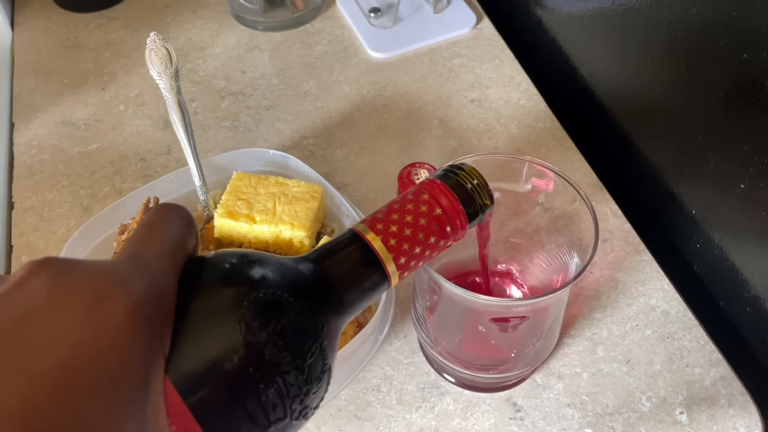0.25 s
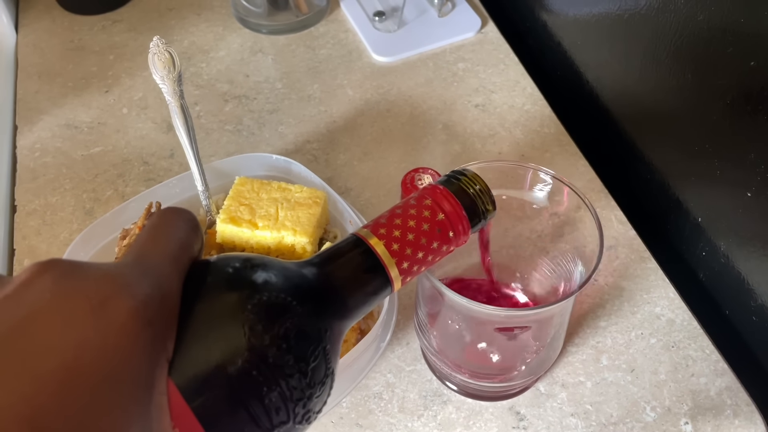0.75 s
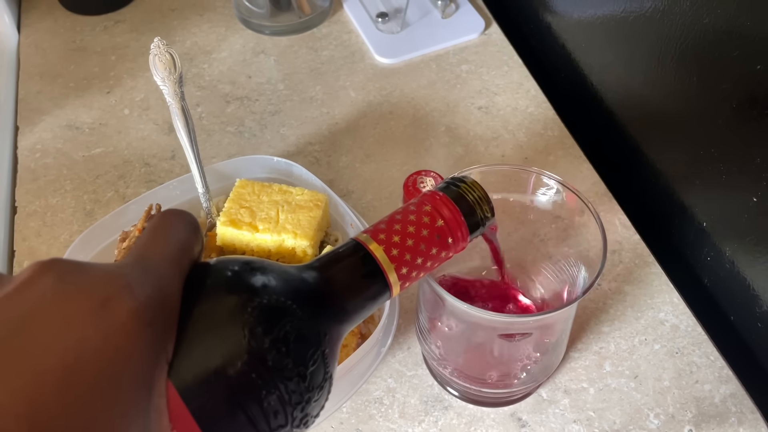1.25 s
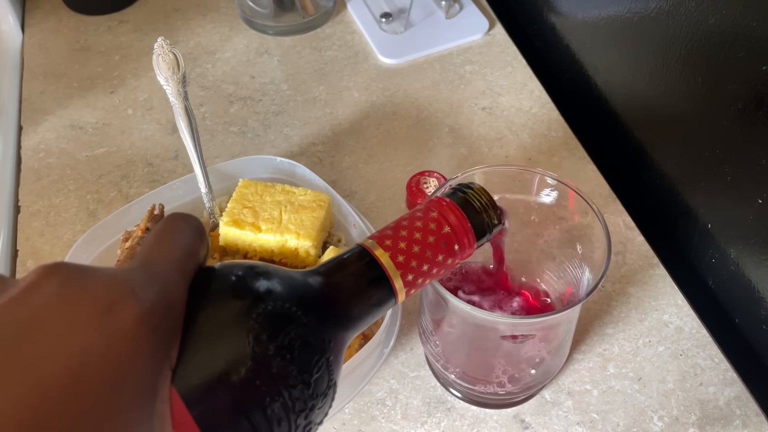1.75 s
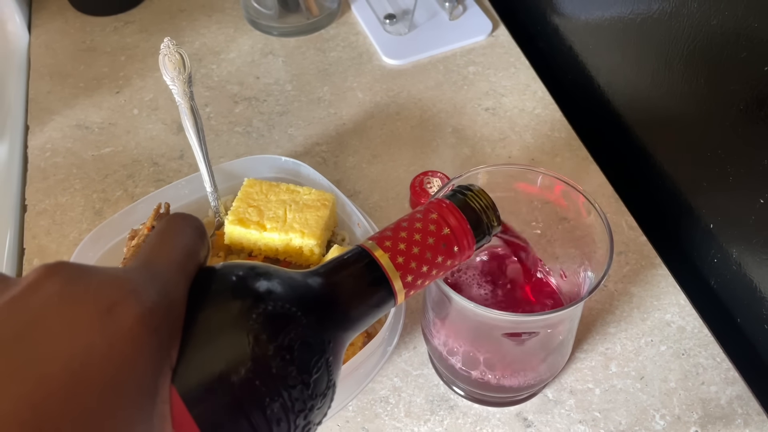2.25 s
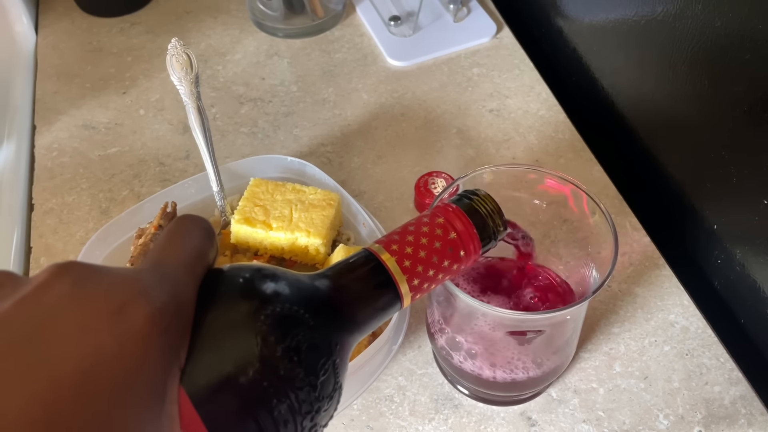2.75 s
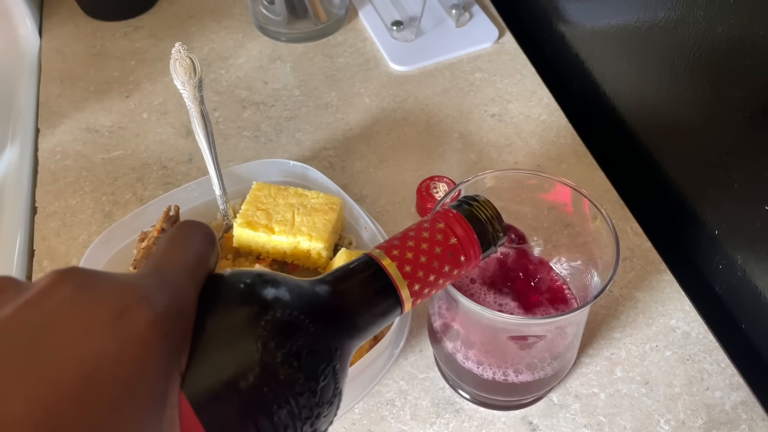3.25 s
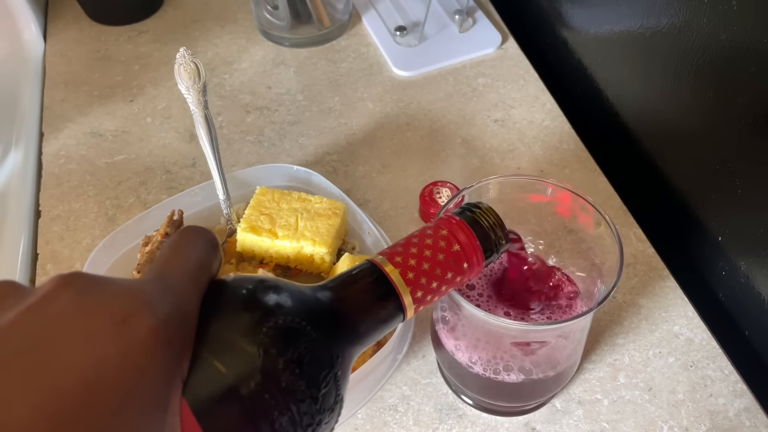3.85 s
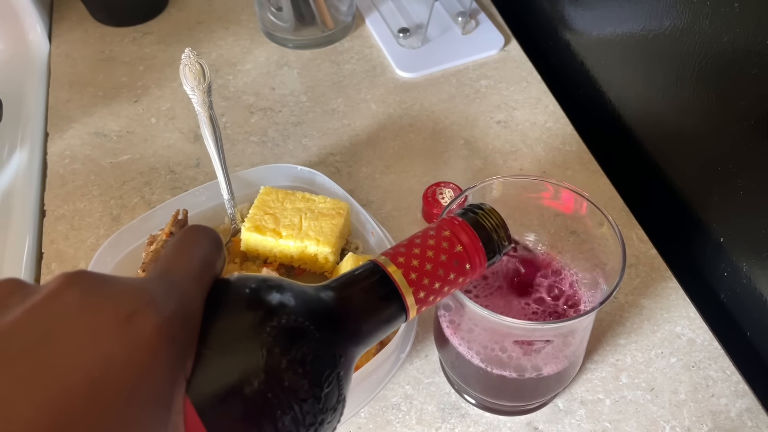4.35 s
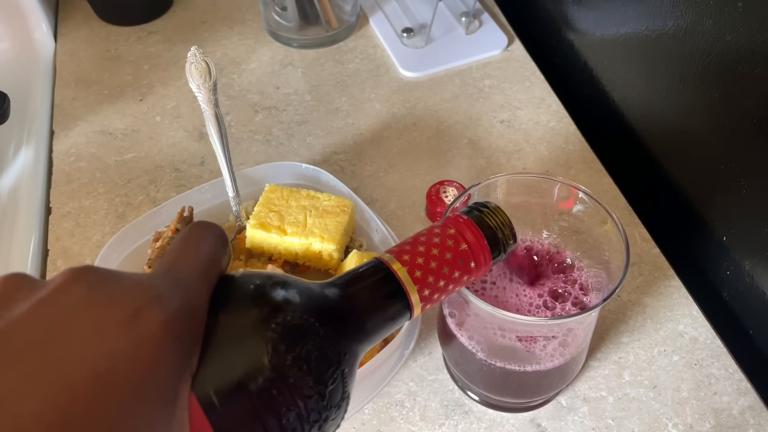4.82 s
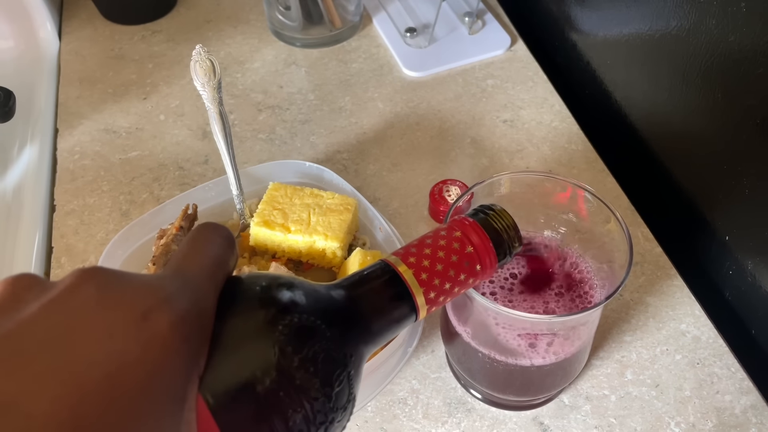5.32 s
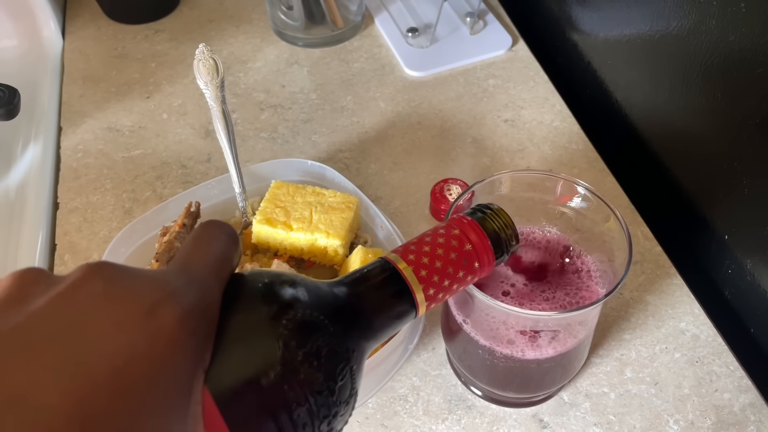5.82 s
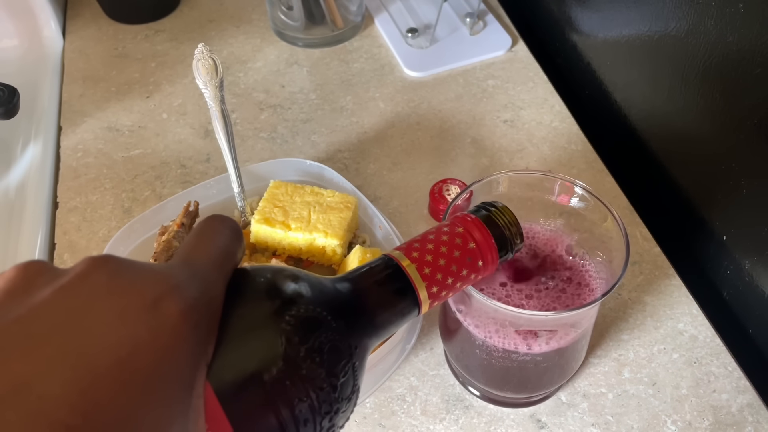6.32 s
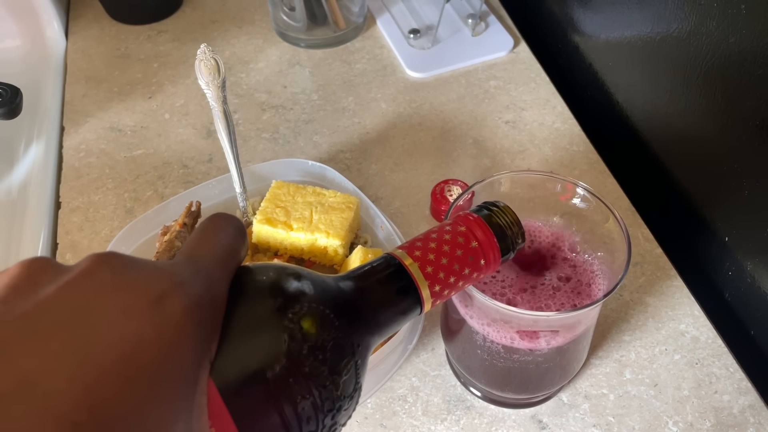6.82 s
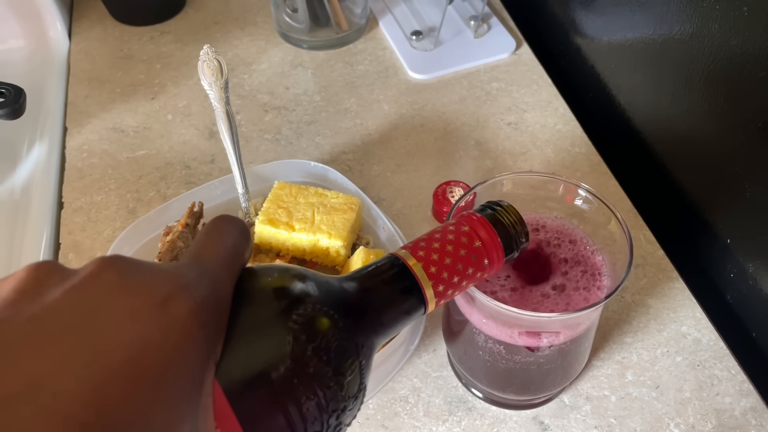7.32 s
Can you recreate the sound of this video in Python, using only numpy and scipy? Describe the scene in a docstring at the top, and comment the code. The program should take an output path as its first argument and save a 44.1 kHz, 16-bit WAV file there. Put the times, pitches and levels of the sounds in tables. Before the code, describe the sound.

Fizzy wine glugs into a glass, heard close in stereo in a small, fairly dry kitchen. Hollow pops repeat around four times a second, with ringing bubbles and crisp splashes. One small knock on the glass comes early. Later the neck pops fade, low air pockets boom in the bottle, foam dulls the splashing, and a delicate crackling hiss remains as the pour continues.

```python
"""Sparkling wine poured into a tumbler

Wine glugs from a bottle into a tumbler on a kitchen counter, close to a two-port microphone.
Air pops through the neck about four times a second, and air pockets boom lower inside the bottle.
Decaying tones make pops, bubbles, gulps and one tap on the rim; shaped noise makes slosh and spray.
Foam builds, recolours the plops, hushes the fine stream and fizzes; the kitchen answers briefly
over a low rumble."""
import sys
import numpy as np
from scipy import signal
from scipy.fft import rfft, irfft, next_fast_len
from scipy.io import wavfile
from scipy.ndimage import map_coordinates

SR = 44100
rng = np.random.default_rng(int(sys.argv[2]) if len(sys.argv) > 2 else 0)


def master_out(mix):
    """Clip the mix to full scale and print it as 16-bit PCM to the path in sys.argv[1]."""
    frames = np.transpose(np.atleast_2d(mix))
    ceiling = np.clip(frames, -1, 1)
    pcm = np.round(ceiling * 32767).astype(np.int16)
    wavfile.write(sys.argv[1], SR, pcm)


N = 334278  # length [samples]


def amp(db):
    """Turn decibels into a gain."""
    return 10 ** (np.asarray(db) / 20)


def unit(x):
    """Scale x to an average (rms) strength of 1."""
    return x / np.sqrt(np.mean(x ** 2) + 1e-20)


def along(points, hz):
    """Read (frequency [Hz], value) points, joined by lines on a log frequency axis."""
    f, v = np.transpose(points)
    return np.interp(np.log(hz + 1), np.log(f + 1), v)


def curves(rows):
    """Join the points of each column after the time into one value per sample."""
    s, *cols = np.transpose(rows)
    return [np.interp(np.arange(N) / SR, s, c) for c in cols]


def filtered(x, response):
    """Multiply the spectrum of x by a response, which may be complex."""
    m = next_fast_len(N + SR // 2)
    hz = np.fft.rfftfreq(m, 1 / SR)
    return irfft(rfft(x, m) * response(hz), m)[..., :N]


def coloured(x, spectrum):
    """Shape x by a spectrum and scale it to rms 1."""
    return unit(filtered(x, lambda hz: amp(along(spectrum, hz))))


def placed(sounds):
    """Add each (time [s], samples) pair to a silent track at its time."""
    track = np.zeros(N + SR)
    for s, sound in sounds:
        track[max(round(s * SR), 0):][:len(sound)] += sound
    return track[:N]


def fade(t60, attack, size=SR // 3):
    """An envelope of peak 1: it swells over attack [s] while decaying by 60 dB every t60 [s]."""
    t = np.arange(size) / SR
    shape = (1 - np.exp(-(t / attack) ** 2)) * amp(-60 * t / t60)
    return shape / (shape.max(axis=-1, keepdims=True) + 1e-12)


def ring(hz, t60, rise, swell, size=SR // 3):
    """A damped resonance: it swells over some cycles and its pitch moves by the share rise as it dies."""
    pitch = hz * (1 + rise * np.minimum(np.arange(size) / SR / t60, 1))
    wave = np.sin(2 * np.pi * np.cumsum(pitch, axis=-1) / SR)
    return fade(t60, swell / hz, size) * wave


CLUMP_S = 0.022  # bubbles of one clump are born within this time [s]


def bubbles(rate, centre_hz, spread, cycles, scatter_db, rise, size=1500, count=1):
    """A cloud at rms 1, in clumps of count, of bubbles with random pitch, life and glide; few are strong."""
    when, pitch, life, strength, depth, lag = rng.random((int(rate * N / SR), 6)).T
    detune = np.exp(spread * np.log((pitch + 1e-6) / (1 - pitch)))
    hz = np.clip(centre_hz * detune, 150, 14000)[:, None]
    gain = amp(-scatter_db * np.log(np.maximum(strength, .04)))[:, None]
    t60 = np.minimum(cycles * np.exp(2 * life[:, None] - 1) / hz, size / SR)
    clump = np.arange(len(when)) // count
    start = when[clump] * N + CLUMP_S * SR * lag ** 2
    index = start.astype(int)[:, None] + np.arange(size)
    sound = gain * ring(hz, t60, 2 * rise * depth[:, None], 1.65, size)
    return unit(np.bincount(index.ravel(), sound.ravel(), N)[:N])


def wobble(rate):
    """A smooth random curve with rate random points a second."""
    knots = rng.standard_normal(int(N * rate / SR) + 4)
    return map_coordinates(knots, [np.arange(N) * rate / SR])


# The steady stream between gushes: (time [s], relative level [dB])
POUR = [(0, -49.5), (2.6, -51.5), (4.1, -53.5), (7.5, -54)]
# Colour of spray and droplets: (frequency [Hz], relative level [dB])
SPRAY = [(900, -30), (2000, -6.5), (4500, 2), (7000, 2), (12000, 0.5), (15000, -10.5)]


def stream(foam):
    """The falling stream beats in clumps of small bubbles and droplets over a soft wash; foam hushes them."""
    flow = amp(curves(POUR)[0] + 2.96 * wobble(28))
    tinkle = bubbles(rate=650, centre_hz=3000, spread=.23, cycles=25, scatter_db=4.2, rise=.05,
                     size=1000, count=7)
    ticks = bubbles(rate=170, centre_hz=7000, spread=.3, cycles=5, scatter_db=5.8, rise=.08,
                    size=300, count=3)
    droplets = coloured(ticks + amp(-16) * rng.standard_normal(N), SPRAY)
    return flow * (amp(-5 - 6.5 * foam) * tinkle + amp(0.5 - 9.1 * foam) * droplets)


# Air resonances of the tumbler and the bottle over it: (frequency [Hz])
CAVITY_HZ = [337, 465, 621, 733, 829]


def cavity(splash):
    """Splashing sets the enclosed air ringing at its own notes."""
    air = sum(ring(hz, 0.12, 0, 0.1) for hz in CAVITY_HZ)
    strongest = np.abs(rfft(air)).max()
    return signal.fftconvolve(splash, air / strongest)[:N]


def counter(x, size=SR // 4):
    """A quick random scatter off counter, bottle and dishes, drawn afresh every quarter second."""
    def scatter():
        paths = rng.standard_normal(SR // 3) * fade(0.036, 0.00057)
        return paths / np.linalg.norm(paths)
    return placed((i / SR, signal.fftconvolve(x[i:i + size], scatter())) for i in range(0, N, size))


# How long the room takes to die away by 60 dB: (frequency [Hz], decay time [s])
KITCHEN = [(150, 0.86), (1500, 0.31), (7000, 0.065)]


def kitchen(x):
    """The room's short answer is decaying noise that dies faster in the treble."""
    hz, t, z = signal.stft(rng.standard_normal(SR // 2), SR, nperseg=256)
    decay = amp(-60 * t / along(KITCHEN, hz)[:, None])
    tail = signal.istft(z * decay, SR, nperseg=256)[1]
    delayed = np.pad(tail, (SR // 150, 0))  # the answer comes a little late
    return signal.fftconvolve(x, delayed / np.linalg.norm(tail))[:N]


# Colour of the fizz and its hiss: (frequency [Hz], relative level [dB])
FIZZ = [(500, -15), (1500, -19.5), (4500, 1.5), (12000, -5.5), (14500, -6)]


def fizz(foam):
    """Tiny gas bubbles burst in the foam, over a steady fine hiss."""
    bursts = bubbles(rate=1500, centre_hz=6000, spread=.45, cycles=5, scatter_db=6, rise=0, size=120)
    crackle = amp(-77) * foam * coloured(bursts, FIZZ)
    hiss = amp(-77) * coloured(rng.standard_normal(N), FIZZ)
    return crackle + hiss


# The loudest single bubbles in the tumbler: (time [s], level [dB], approximate starting note [Hz])
PLINKS = [(0.176, -32, 2110), (0.222, -48.5, 754), (0.363, -32.5, 2880), (0.552, -29.5, 2205),
          (0.8216, -21.5, 6400), (1.368, -25.5, 3600), (1.46, -38, 756), (1.6533, -27, 5260),
          (1.69, -31, 790), (1.9175, -22, 9900), (1.9557, -23.5, 3440), (1.979, -30.5, 794),
          (2.1737, -13, 4720), (2.752, -19, 6400), (2.9077, -19.5, 4800), (3.173, -22.5, 5630),
          (3.7378, -24, 5780), (3.8019, -12, 6940), (4.0487, -13, 7330), (4.259, -21, 9400),
          (4.3386, -22, 10700), (4.506, -37, 753), (5.533, -39.5, 678)]
# Big bubbles that climb in pitch as they surface, just after the bottle tips: (time [s], level [dB])
BLOOPS = [(1.21, -39.5), (1.334, -42.5), (1.505, -47)]
BLOOP_HZ, BLOOP_S, BLOOP_RISE = 270.6, 0.054, 0.83  # start [Hz], length [s], climb as a share of the start


def plinks():
    """Single bubbles ring and rise in pitch; they ring longest at first, while the wine is still clear."""
    cycles = lambda s: np.interp(s, [.3, 2], [90, 28])
    small = placed((s, amp(db) * ring(hz * 0.99, cycles(s) / hz, 0.1, 0.47)) for s, db, hz in PLINKS)
    age = np.linspace(0, 1, int(BLOOP_S * SR))
    climb = np.cumsum(1 + BLOOP_RISE * age ** 2)  # the note holds at first, then curls up
    bloop = (1 - age ** 2) * np.sin(2 * np.pi * BLOOP_HZ * climb / SR)
    big = placed((s, amp(db) * bloop) for s, db in BLOOPS)
    return small + big


# Air breaking into the neck: (time [s], relative level [dB], starting note of the neck [Hz])
POPS = [(0.2432, -33, 1680), (0.5111, -35.5, 1690), (0.778, -32.5, 1770), (1.2089, -34.5, 1390),
        (1.335, -34.5, 1570), (1.503, -37, 1624), (1.699, -37.5, 1680), (1.8795, -28.5, 1768),
        (2.1014, -34.5, 1720), (2.278, -29.5, 1670), (2.4462, -30.5, 1645), (2.652, -34.5, 1820),
        (2.8877, -32.5, 1815), (3.139, -36, 1740), (3.329, -38, 1800), (3.5781, -38.5, 1800),
        (3.7687, -39, 1820), (4.6482, -35.5, 1810), (4.9, -40, 1996)]


def neck():
    """Each pop rings the neck's short air column and the bottle's hollow; harder pops have more overtone."""
    def pop(db, hz):
        overtone = amp(16.5 + 0.54 * db) * ring(hz * 2.144, 0.012, 0, 0.87)
        column = ring(hz, 0.04, 0.01, 0.06) + overtone
        hollow = amp(-14) * ring(337, 0.043, 0, 0.28) + amp(-11.5) * ring(85, 0.038, 0, 0.83)
        return amp(db) * (column + hollow)
    return amp(4) * placed((s, pop(db, hz)) for s, db, hz in POPS)


# Slugs of wine that break from the stream and hit the surface:
# (time [s], relative plop level [dB], relative spray level [dB])
SPLATS = [(1.048, -43.5, -37.5), (1.689, -45.5, -38), (2.141, -44.5, -35.5), (2.174, -44, -52),
          (2.198, -60, -42.5), (2.308, -47, -47), (2.546, -43.5, -38), (2.59, -44, -42), (2.712, -45, -51),
          (2.733, -44.5, -38.5), (2.76, -60, -59), (2.91, -43, -30), (2.953, -43.5, -67), (3.188, -43, -62),
          (3.327, -43.5, -61), (3.412, -50.5, -39.5), (3.475, -46, -50), (3.586, -38, -38.5),
          (3.632, -65, -57), (3.795, -43.5, -41), (3.857, -44.5, -42.5), (3.991, -46.5, -42.5),
          (4.044, -52.5, -63), (4.202, -43, -50), (4.292, -49.5, -46.5), (4.337, -44, -48),
          (4.468, -43.5, -48), (4.861, -47.5, -50), (5.077, -42.5, -43.5), (5.171, -50, -49.5),
          (5.315, -50, -58), (5.425, -46.5, -47.5), (5.595, -52.5, -72), (5.673, -53.5, -48),
          (5.708, -56.5, -74), (5.807, -45.5, -37), (6.048, -42.5, -53), (6.303, -48.5, -42),
          (6.402, -48.5, -61), (6.519, -40.5, -35.5), (6.587, -54, -50), (6.634, -53, -80),
          (6.71, -61, -52), (6.74, -50, -51), (6.769, -53, -51.5), (6.891, -51, -42.5), (7.394, -48, -65),
          (7.423, -52.5, -73), (7.502, -47.5, -41)]
# Plop colour on open wine: (frequency [Hz], relative level [dB])
PLOP_OPEN = [(90, -32.5), (170, 13), (240, -4.5), (470, 7.5), (820, 7.5), (1050, -8), (1800, -7.5),
             (3000, -24.5)]
# Plop colour under foam: (frequency [Hz], relative level [dB])
PLOP_FOAMY = [(430, 7), (560, -21), (800, 15), (1050, -9.5), (1320, 13.5), (1600, -5.5), (2100, 1.5),
              (3200, -65)]


def splats(foam):
    """A slug cracks the surface and opens a crater that plops downward; gurgle and grainy spray follow."""
    open_wine, foamy, spray = rng.standard_normal((3, N))
    open_slosh = np.sqrt(1 - foam) * coloured(open_wine, PLOP_OPEN)
    slosh = open_slosh + np.sqrt(foam) * coloured(foamy, PLOP_FOAMY)
    wet = SPLATS + [(s, db - 13, hz) for s, db, hz in POPS]  # each pop in the neck sloshes the wine too
    slap = placed((s, amp(db) * fade(0.05, 0.002)) for s, db, _ in wet)
    burst = fade(0.015, 0.00024) + amp(-25) * fade(0.24, 0.015)  # a sharp crack, then a faint tail
    crack = placed((s, amp(db) * burst) for s, _, db in SPLATS)
    crater_hz = lambda: 740 * np.exp(0.18 * rng.normal())
    crater = placed((s, amp(db) * ring(crater_hz(), 0.021, -0.31, 0.96)) for s, db, _ in SPLATS)
    trail = placed((s, amp(db) * fade(0.27, 0.012)) for s, db, _ in SPLATS)

    gurgle = bubbles(rate=300, centre_hz=560, spread=.27, cycles=11, scatter_db=2.8, rise=.08)
    pips = bubbles(rate=200, centre_hz=1600, spread=.15, cycles=16, scatter_db=4, rise=-.05)
    grains = bubbles(rate=1100, centre_hz=4000, spread=.2, cycles=12, scatter_db=4, rise=.05, size=400)
    wake = trail * (amp(-8.5 - 5.4 * foam) * gurgle + amp(-13) * pips)
    plop = amp(2 + 7.1 * foam) * slap * slosh
    shower = amp(9) * crack * coloured(spray / 2 + grains, SPRAY)
    return plop + shower + amp(7.5 - 1.3 * foam) * crater + wake


# Notes of the tumbler's wall: (frequency [Hz], relative level [dB], time to die by 60 dB [s])
WALL = [(760, -25.5, 0.24), (1480, -12, 0.11), (1670, 0, 0.019), (2162, 3.5, 0.018), (3750, -19, 0.035)]
TAP_S, TAP_DB = 1.0596, -14  # time [s], level added to every wall note [dB]


def tap():
    """The neck knocks the rim once; the wall rings briefly."""
    wall = sum(amp(db) * ring(hz, t60, 0, 1.0) for hz, db, t60 in WALL)
    return placed([(TAP_S, amp(TAP_DB) * wall)])


# Large air pockets swinging inside the bottle: (time [s], relative level [dB])
GULPS = [(2.553, -45), (3.129, -39), (3.548, -39.5), (3.756, -40.5), (4.003, -43.5), (4.217, -41),
         (4.429, -38), (4.622, -42), (5.129, -45), (5.583, -37.5), (5.821, -37), (6.043, -33.5),
         (6.479, -42), (6.793, -34.5), (7.248, -38), (7.512, -43)]
# The note each pocket settles to: (time [s], frequency [Hz])
POCKET = [(2.6, 83.4), (4.8, 71), (5.2, 90.7), (7.5, 103.5)]
GULP_DROP, GULP_DROP_S = 2.08, 0.0049  # starts this share higher, settles with this time constant [s]
HUM_S, HUM_DB, HUM_HZ = 1.1, -55.5, 184.3  # the bottle's air as glugging sets in: [s], [dB], [Hz]


def bottle():
    """Air pockets boom, dropping quickly in pitch as they swell; early on the bottle's air hums softly."""
    drop = 1 + GULP_DROP * np.exp(-np.arange(SR // 3) / SR / GULP_DROP_S)
    boom = lambda hz: fade(9 / hz, 1 / hz) * np.sin(2 * np.pi * hz * np.cumsum(drop) / SR)
    pocket_hz = lambda s: np.interp(s, *np.transpose(POCKET))
    gulps = amp(4.5) * placed((s, amp(db) * boom(pocket_hz(s))) for s, db in GULPS)
    hum = amp(HUM_DB) * ring(HUM_HZ, 3.2, 0, 70, size=2 * SR)
    return gulps + placed([(HUM_S, hum)])


BLISTER_S, BLISTER_DB, BLISTER_HZ = 6.9772, -27.5, 2330  # time [s], relative level [dB], first note [Hz]


def blister():
    """One large foam bubble snaps open and rings unsteadily, rising in pitch."""
    snap = amp(12.5) * ring(3100, 0.00082, 0, 0.14) + amp(-14.5) * ring(1470, 0.018, 0, 1)
    unsteady = .15 + .5 * wobble(420)[:SR // 3]
    tone = ring(BLISTER_HZ, 0.11, 0.1, 2) * unsteady
    return placed([(BLISTER_S, amp(BLISTER_DB) * (snap + tone))])


# Foam cover: (time [s], share of the surface)
FOAM = [(3.8, 0.14), (4.9, 1)]
# Colour of the low rumble: (frequency [Hz], relative level [dB])
RUMBLE = [(24, -33), (50, 7), (110, -4), (600, -27), (8000, -37.5)]
# How reflections differ between the close ports: (frequency [Hz], relative level [dB])
PORT_SPREAD = [(250, -10.5), (650, 0.5)]
# Loudness difference of the ports: (frequency [Hz], left minus right [dB])
PORT_BALANCE = [(500, .3), (780, -2), (1200, 4), (2400, 4), (8000, -.5)]
# Phase difference of the ports: (frequency [Hz], lead of the left [radians])
PORT_LEAD = [(300, 0), (800, .5), (1500, -.4), (2300, .6), (5100, .7), (6200, -.6), (8100, -3.14),
             (15000, -9.4)]


def scene():
    """Foam recolours plops and hushes the stream; two ports differ in phase and level; a rumble lies below."""
    foam = np.clip(curves(FOAM)[0], 0, 1)
    splash = splats(foam) + stream(foam)
    pour = neck() + plinks() + splash + amp(-5) * cavity(splash) + tap() + blister() + fizz(foam)
    mid = pour + bottle() + amp(-6) * counter(pour) + amp(-15) * kitchen(pour)
    mid = mid + amp(-55) * coloured(rng.standard_normal(N), RUMBLE)
    # separate random reflections, opposite in the two ports, give width
    reflections = amp(-16.5) * kitchen(pour) + amp(-14) * counter(pour)
    side = filtered(reflections, lambda hz: amp(along(PORT_SPREAD, hz)))
    sides = np.array([[1], [-1]])  # left, right

    def ports(hz):
        level = amp(sides * along(PORT_BALANCE, hz) / 2)
        return level * np.exp(.5j * sides * along(PORT_LEAD, hz))
    return filtered(mid + sides * side, ports)


TOP_HZ = 16800  # band limit [Hz]


def record(dry):
    """Keep nothing at or above the band limit."""
    return filtered(dry, lambda hz: hz < TOP_HZ)


dry = scene()
out = record(dry)
master_out(out)
```